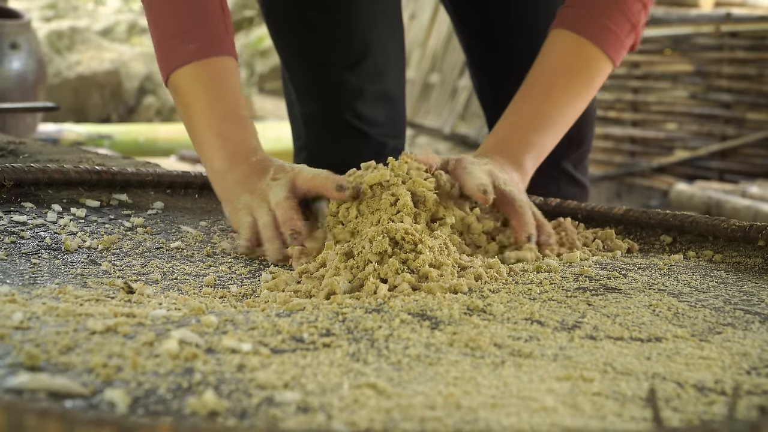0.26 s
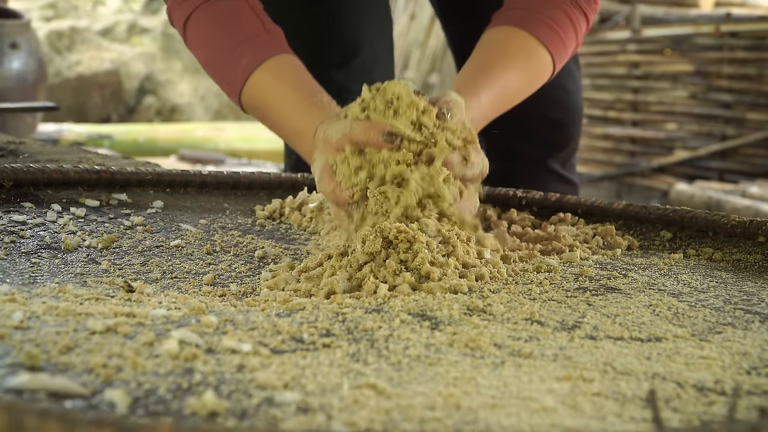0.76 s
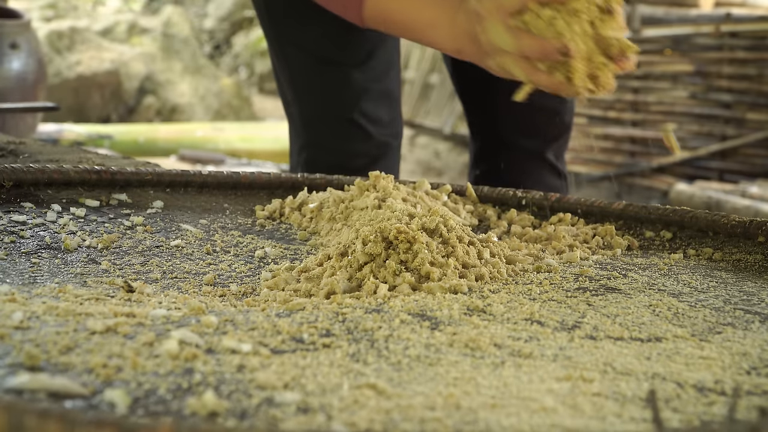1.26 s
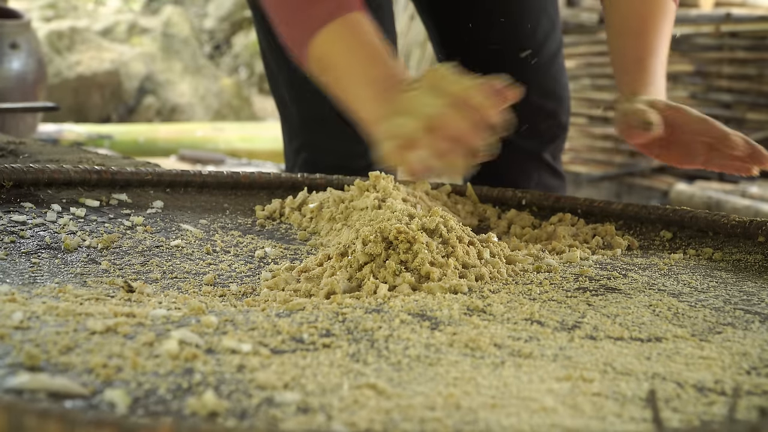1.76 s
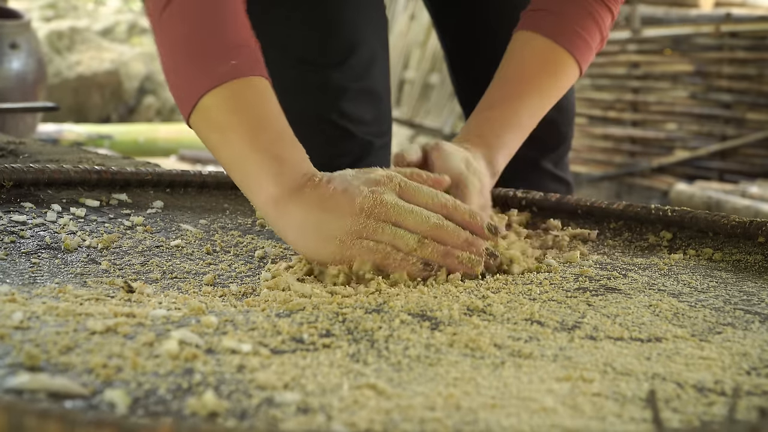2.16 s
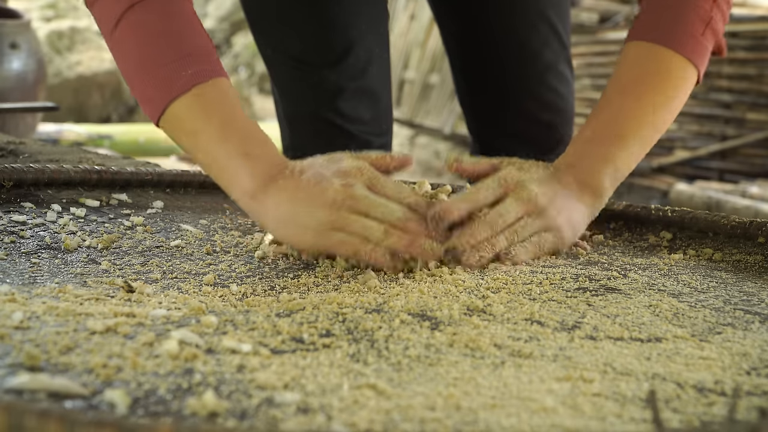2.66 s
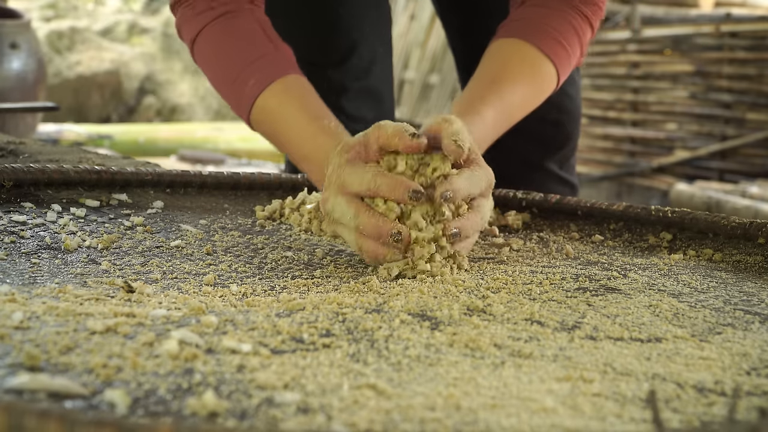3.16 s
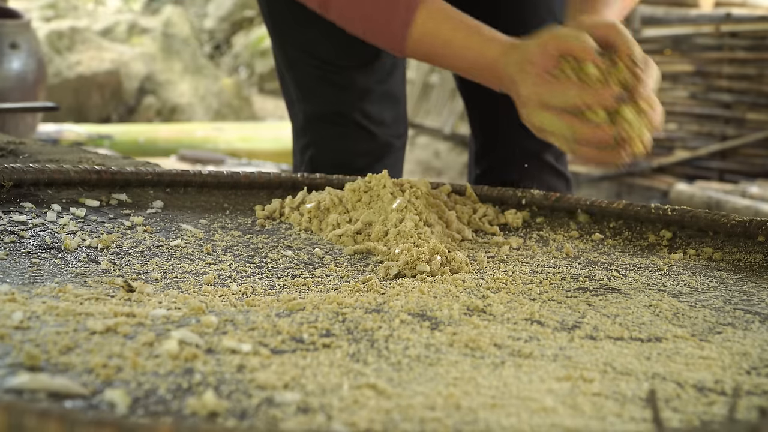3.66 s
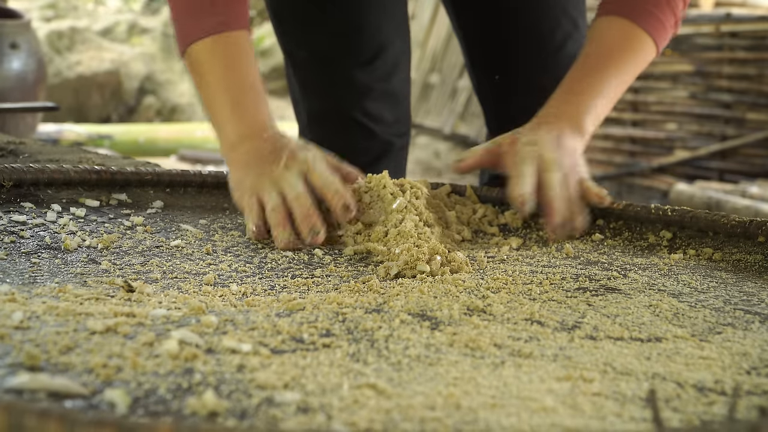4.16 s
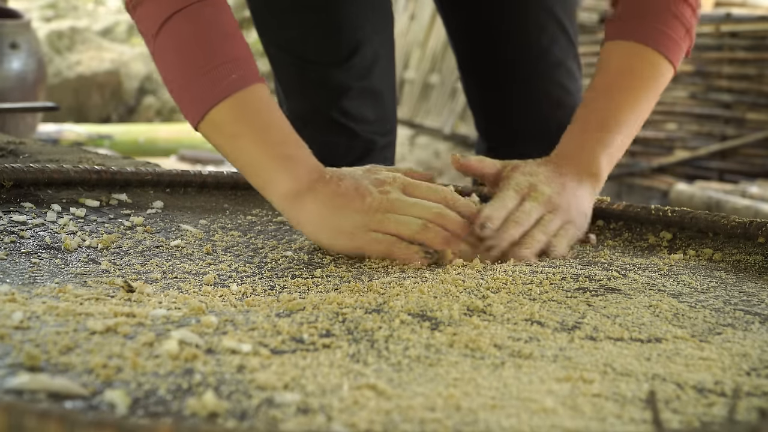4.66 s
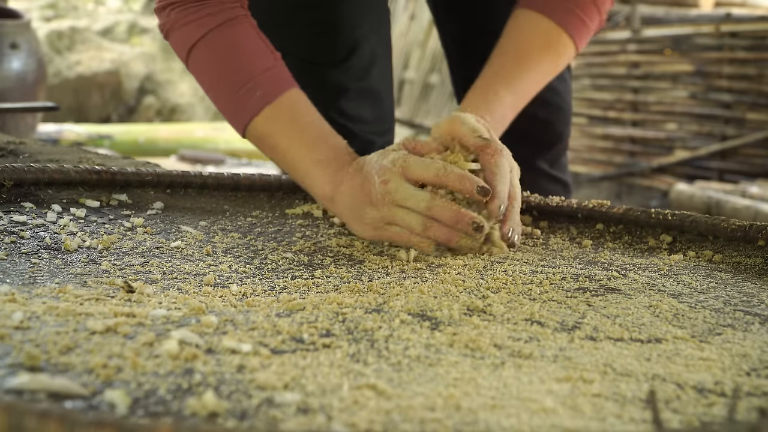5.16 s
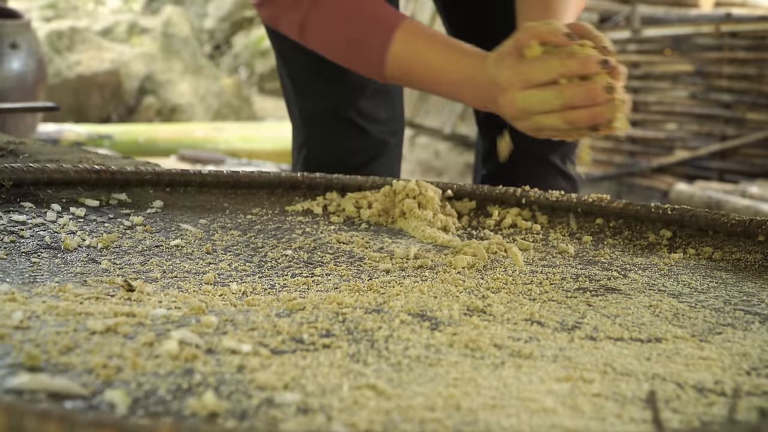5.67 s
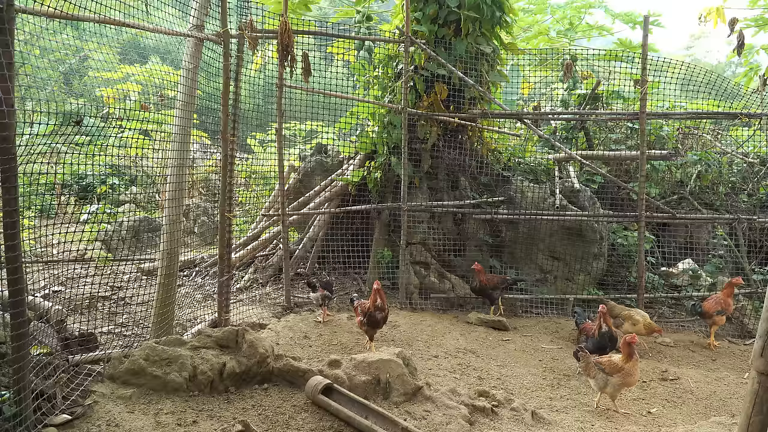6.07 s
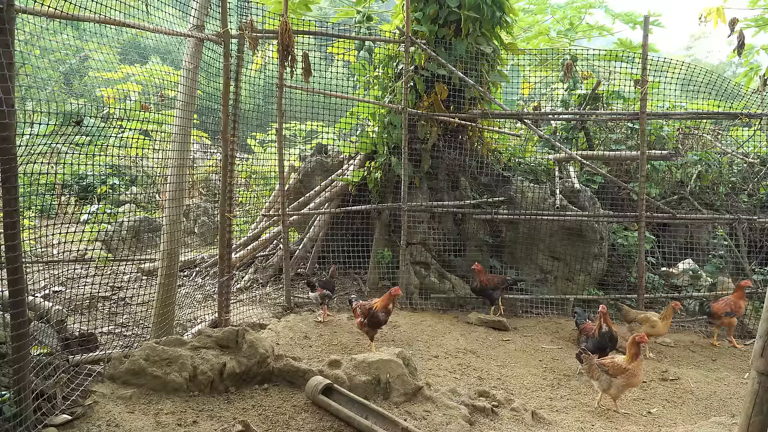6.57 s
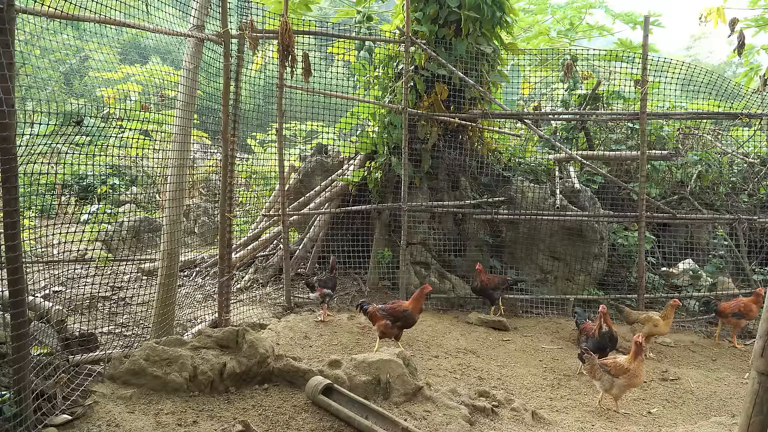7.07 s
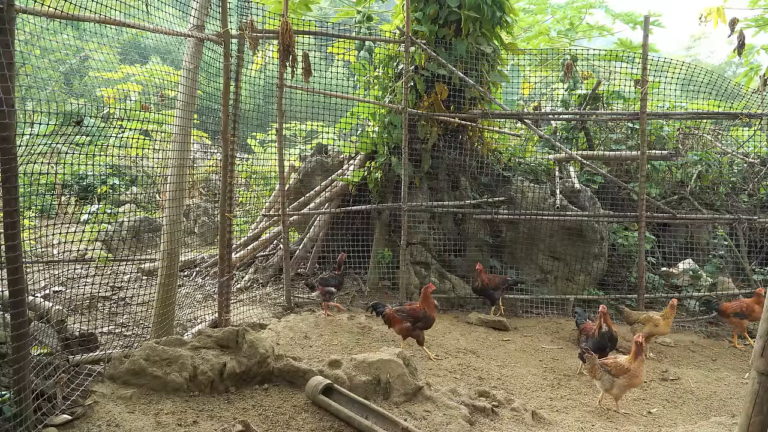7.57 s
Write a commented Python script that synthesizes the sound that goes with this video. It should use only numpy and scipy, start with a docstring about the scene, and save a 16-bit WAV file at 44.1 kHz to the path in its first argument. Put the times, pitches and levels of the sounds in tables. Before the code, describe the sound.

Hands sweep and scoop damp crumbly feed on a woven tray, thudding and pattering into a bucket beside a chirping cricket, then a quiet hen yard.

```python
"""Hands sweep damp feed over a wide woven tray and drop handfuls into a bucket, a cricket chirping near by;
then a cut to a quiet hen yard: insects sing, thin whistles sound far off, a hen pecks and scratches.
Feed is random contacts filtered by tray, heap and grit spectra; blows are decaying tones and grain bursts.
Cricket and insects are resonant noise, whistles wavering sines, the hen scuffing contacts and bursts."""
import sys
import numpy as np
from scipy import signal
from scipy.io import wavfile
from scipy.ndimage import uniform_filter1d

SR = 44100
rng = np.random.default_rng(int(sys.argv[2]) if len(sys.argv) > 2 else 0)


def wav_record(signal):
    """Record a signal, one row per channel, as 16-bit PCM in the file named by sys.argv[1]."""
    frames = np.transpose(np.atleast_2d(signal))
    bounded = np.clip(frames, -1, 1)
    # unit amplitude maps onto the largest positive 16-bit level
    quanta = np.round(bounded * 32767).astype(np.int16)
    wavfile.write(sys.argv[1], SR, quanta)


N = 344862
T = np.arange(N) / SR
BURST_T = T[:4000]
CUT_S = 6.094

# spectrum of grains rubbing in a heap: freq_hz, density_db (relative, per Hz)
HEAP_SPECTRUM = [(250, -16), (450, -3.5), (900, 0), (1300, -3.5), (2500, -11.5), (5000, -32)]
# spectrum of fine dry grit: freq_hz, density_db (relative, per Hz)
GRIT_SPECTRUM = [(1470, -13), (2500, -1), (2640, -1.5), (3980, 3.5), (5150, -1), (6920, -2.5), (8020, -6.5),
                 (14800, -17), (16000, -52)]


def hands():
    """Pellets dragged over the weave drum the tray, rub each other, patter into the bucket and shed grit."""
    # tray drumming: freq_hz, density_db (relative, per Hz)
    tray_spectrum = [(12, -49), (20, -21), (102, -6.5), (151, -4), (202, -2), (232, 0), (265, -2),
                     (348, -8.5), (500, -12), (650, -14.5), (1100, -120)]
    # brightening of hard strokes: freq_hz, density_db (relative, per Hz)
    fizz_spectrum = [(5000, -59), (8000, -6), (12500, 1), (15500, -6), (17000, -50)]
    fizz_db, fizz_power = 24.5, 2.17  # fizz grows as a power of the grit gain
    drum_gain, rub_gain, patter_gain, grit_gain = effort()
    grip = lumpy(0.016, 1.82)  # the heap slips unevenly, in tray and heap alike
    drum = coloured(contacts(1800, 4.4), tray_spectrum)
    rub = patchy(coloured(contacts(1200, 1.6), HEAP_SPECTRUM), 1.85, frames=10, bins=3)
    patter = lumpy(0.0069, 4.1) * evened(bucket(contacts(1200, 1.8)))
    fizz = coloured(contacts(7000, 3.5), fizz_spectrum)
    grit = patchy(coloured(contacts(9000, 2.4), GRIT_SPECTRUM), 2.37, frames=10, bins=14)
    out = grip * (drum_gain * drum + rub_gain * rub)
    out += patter_gain * patter + grit_gain * grit
    return out + gain_of(fizz_db) * grit_gain ** fizz_power * fizz


def effort():
    """Gains of tray, heap, pellets and grit: steady stirring plus strokes, hushed while the fingers rest."""
    # hand strokes: start_s, peak_s, end_s, tray_db, heap_db, pellets_db, grit_db
    strokes = [(0.052, 0.14, 0.18, -63, -62, -39, -60), (0.153, 0.3, 0.72, -27.5, -28.5, -36.5, -39.5),
               (1.203, 1.225, 1.39, -59, -38, -37.5, -56), (1.576, 1.686, 1.71, -48, -27, -31, -54),
               (2, 2.152, 2.216, -21, -24, -32, -31), (2.15, 2.23, 2.37, -21.5, -24.5, -36, -41),
               (2.28, 2.343, 2.9, -38.5, -42, -47, -49), (2.499, 2.661, 2.734, -21, -22, -31.5, -28.5),
               (2.817, 2.947, 3.11, -23, -27, -31.5, -31), (2.958, 3.08, 3.36, -29, -31, -38.5, -33.5),
               (3.532, 3.637, 4, -42, -36.5, -48, -37.5), (3.82, 3.966, 3.96, -46, -29.5, -30.5, -55),
               (4.192, 4.272, 4.436, -24.5, -25, -29.5, -29.5), (4.5, 4.66, 4.95, -21.5, -25.5, -31.5, -32),
               (4.846, 5.03, 5.4, -31, -29, -32.5, -34), (5.082, 5.274, 5.7, -36, -38.5, -43, -40),
               (5.46, 5.564, 5.66, -31, -34, -38.5, -37.5), (5.799, 5.916, 6.1, -48, -60, -39, -61),
               (6.028, 6.047, 5.8, -44, -27.5, -31, -44)]
    # finger rests: start_s, end_s, change_db
    rests = [(1.252, 1.263, -6), (5.452, 5.469, -6), (5.655, 5.677, -2), (5.912, 5.957, -4.5)]
    # stirring between strokes: level_db of tray, heap, pellets, grit
    stir_db = [-43, -43, -43.5, -36.5]
    swell_power = 0.93  # 1 is a straight swell, less is rounder
    power = np.outer(gain_of(stir_db), lumpy(0.022, 2.5)) ** 2
    for start, peak, end, *levels_db in strokes:
        span = slice(int(start * SR), int(max(peak, end) * SR))
        swell = np.interp(T[span], [start, peak, end], [0, 1, 0]) ** swell_power
        power[:, span] += np.outer(gain_of(levels_db), swell) ** 2
    for start, end, db in rests:
        hush_db = np.interp(T, [start - .01, start, end - .001, end], [0, db, db, 0])
        power *= gain_of(hush_db) ** 2
    return np.sqrt(power)


def knocks():
    """Lumps and knuckles hit the tray: a decaying low thud, and a slap mixed with loose grains."""
    # tray knocks: start_s, thud_level_db, thud_hz, slap_peak_db, slap_hz
    knock_table = [(0.279, -33, 180, -21, 890), (0.351, -24, 277, -13, 900), (0.823, -28, 278, -38, 500),
                   (0.846, -31, 247, -10, 787), (0.85, -36, 250, -14, 830), (0.894, -24.5, 332, -15.5, 615),
                   (0.929, -22, 243, -39, 678), (1.125, -23.5, 255, -30, 796),
                   (1.214, -43, 221, -23.5, 1300), (1.265, -11.5, 246, -18, 635),
                   (1.281, -32, 278, -20, 1010), (1.308, -40, 250, -24, 950), (1.29, -21.5, 258, -23, 796),
                   (1.823, -27, 200, -18.5, 1000), (2.141, -9.5, 240, -12, 880),
                   (2.492, -18.5, 135, -19.5, 668), (2.634, -15, 245, -8, 860),
                   (2.767, -34, 281, -19, 1010), (2.852, -15.5, 125, -21, 530),
                   (2.861, -14.5, 111, -34, 533), (2.928, -8.5, 278, -28, 750),
                   (3.2055, -8.5, 181, -36, 500), (3.7, -24, 121, -27, 506), (3.769, -49, 208, -19, 1020),
                   (4.158, -34, 298, -20, 1020), (4.206, -14, 136.2, -39, 587),
                   (4.532, -12.5, 152, -32, 794), (4.611, -16, 161, -13.5, 1060),
                   (4.642, -16, 148, -20, 1010), (5.329, -22.5, 280, -27, 907), (5.495, -35, 150, -22, 800),
                   (5.501, -22, 119.3, -21, 795), (5.529, -11, 186, -14.5, 557),
                   (5.559, -34, 205, -17, 1060), (5.602, -22, 300, -14.5, 780), (5.618, -39, 250, -20, 800),
                   (5.629, -14.5, 210, -9, 960), (5.712, -29, 300, -18, 715), (5.72, -43, 250, -18.5, 665),
                   (5.735, -44, 250, -23, 750), (5.802, -15, 276, -12.5, 937), (5.889, -32, 200, -40, 600),
                   (5.932, -25, 185, -41, 600), (6.033, -40, 300, -14, 770)]
    thud_rise_s, thud_t60_s = 0.0014, 0.031
    slap_rise_s, slap_t60_s, splash_share = 0.00016, 0.019, 0.7
    out, t = np.zeros(N), BURST_T
    thud_shape = peaked(gain_of(-60 * t / thud_t60_s) * (1 - np.exp(-t / thud_rise_s)))
    slap_shape = peaked(gain_of(-60 * t / slap_t60_s) * (1 - np.exp(-t / slap_rise_s)))
    sagging_s = t + 0.085 * 0.0024 * (1 - np.exp(-t / 0.0034))  # pitch starts 6 % sharp and settles
    for s, thud_db, thud_hz, slap_db, slap_hz in knock_table:
        thud = gain_of(thud_db) * thud_shape * np.cos(2 * np.pi * thud_hz * sagging_s)
        slap = slap_shape * np.sin(2 * np.pi * slap_hz * sagging_s)
        slap += splash_share * burst(1.02 * slap_hz, 1600, 0.0058, 0.13, first=1.7)
        add(out, s, -thud - gain_of(slap_db) * peaked(slap))
    return out


def clumps():
    """Clumps break up in the bucket: grain bursts, heard direct and through the ringing wall."""
    # breaking clumps: start_s, level_db (before direct and wall gains), centre_hz, length_s
    clump_table = [(0.72, -22.5, 1770, 0.018), (0.807, -22, 2000, 0.0094), (0.823, -26, 2270, 0.01),
                   (0.845, -20, 1690, 0.003), (1.288, -16, 1930, 0.0036), (1.027, -21.5, 1750, 0.0081),
                   (1.327, -22, 1850, 0.016), (1.41, -23, 1460, 0.016), (1.479, -23, 2640, 0.014),
                   (1.5695, -11.5, 2420, 0.0051), (1.577, -11.5, 1520, 0.013), (1.584, -14, 1900, 0.014),
                   (1.626, -11, 1840, 0.0083), (1.634, -8, 1690, 0.0085), (1.6368, -19, 1900, 0.0045),
                   (1.641, -6, 1470, 0.012), (1.663, -14.5, 806, 0.012), (1.786, -23, 1770, 0.053),
                   (2.009, -20.5, 1690, 0.029), (2.432, -17, 3050, 0.013), (3.175, -20, 1610, 0.0071),
                   (3.42, -17.5, 2950, 0.022), (3.462, -24, 3100, 0.038), (3.624, -19, 1800, 0.023),
                   (3.772, -19.5, 1660, 0.022), (3.803, -14.5, 1960, 0.019), (3.893, -10.5, 1900, 0.0086),
                   (3.942, -11, 1720, 0.0032), (3.947, -16, 1500, 0.045), (3.951, -15, 2150, 0.019),
                   (3.967, -11.5, 1820, 0.019), (3.99, -13.5, 1800, 0.0066), (4.013, -16, 1700, 0.0042),
                   (4.31, -16, 2250, 0.014), (4.398, -21.5, 1750, 0.014), (4.478, -18.5, 2600, 0.015),
                   (4.92, -17, 1640, 0.025), (5.379, -11.5, 1950, 0.02), (5.471, -27, 2110, 0.015),
                   (5.629, -11, 2050, 0.0027), (5.749, -20, 1420, 0.018), (5.846, -18.5, 3400, 0.03),
                   (5.898, -23, 1704, 0.01), (5.961, -17, 2300, 0.0033), (5.964, -14.5, 2700, 0.011),
                   (5.968, -17, 1860, 0.0088), (6.033, -16, 1490, 0.0051), (6.041, -19, 1500, 0.016),
                   (6.061, -16, 1500, 0.006)]
    out = np.zeros(N)
    for s, db, hz, length_s in clump_table:
        add(out, s, gain_of(db) * burst(hz, 1490, length_s, .07, first=1.91))
    return 0.84 * out + gain_of(13.5) * bucket(out)


def bucket(x):
    """The bucket wall rings briefly: narrow modes driven through one broad resonance."""
    # wall modes: freq_hz, width_hz, level_db (before division by root width)
    modes = [(721, 59, 10.5), (1443, 81, 5), (1800, 100, 8.5), (1960, 21, -2.5), (2316, 34, -1),
             (2700, 49, 2.5), (3220, 140, 3)]
    x = resonate(x, 2150, 2500)
    return sum(gain_of(db) * resonate(x, hz, width) / np.sqrt(abs(width)) for hz, width, db in modes)


def smacks():
    """Sticky feed peels off the fingers in bright grain bursts."""
    # smacks: start_s, peak_db, centre_hz, length_s
    smack_table = [(0.506, -23, 3960, 0.03), (0.591, -19, 3570, 0.023), (0.778, -27, 5600, 0.017),
                   (1.023, -25.5, 3220, 0.021), (1.061, -24.5, 2750, 0.03), (1.224, -22, 3880, 0.032),
                   (1.334, -25, 4660, 0.02), (1.571, -20.5, 3670, 0.006), (1.585, -23, 3930, 0.017),
                   (1.666, -15.5, 4870, 0.017), (1.929, -22.5, 5370, 0.032), (2.314, -23.5, 5800, 0.036),
                   (2.823, -25, 6670, 0.013), (3.082, -19, 4570, 0.02), (3.162, -24, 4620, 0.14),
                   (3.338, -19.5, 2980, 0.039), (3.816, -25, 6460, 0.031), (4.246, -21, 3400, 0.065),
                   (4.506, -19.5, 3700, 0.027), (4.502, -17.5, 6170, 0.02), (4.495, -29, 12000, 0.032),
                   (5.24, -15.5, 2900, 0.042), (5.47, -23, 3960, 0.025), (5.528, -18, 3230, 0.018),
                   (5.549, -23, 4470, 0.025), (5.679, -18.5, 3780, 0.02), (5.748, -23, 3600, 0.016)]
    out = np.zeros(N)
    for s, db, hz, length_s in smack_table:
        add(out, s, gain_of(db) * burst(hz, 1670, length_s, 0.22, first=1.2))
    return out


def snaps():
    """Dry pellets snap: very short, wide-band bursts."""
    # snaps: start_s, peak_db
    snap_table = [(0.2608, -18), (0.685, -12), (2.654, -3), (2.892, -9), (2.947, -5), (3.396, -14)]
    out = np.zeros(N)
    for s, db in snap_table:
        add(out, s, gain_of(db) * burst(11800, 10000, 0.0027, 0.075, first=2.9))
    return out


def cricket():
    """Chirps of two wing strokes, each a rough whistle (resonant noise plus a sine) that falls in pitch."""
    # chirps: second_stroke_s, first_peak_db, second_peak_db
    chirps = [(0.175, -25, -22.5), (0.266, -21.5, -42), (0.437, -27, -28), (0.701, -27, -24.5),
              (0.916, -31, -26.5), (1.174, -32, -28.5), (1.384, -28, -26), (1.643, -33, -25),
              (2.162, -27, -30), (2.383, -26, -20.5), (2.687, -23, -23), (2.904, -22.5, -21),
              (3.029, -24, -29), (3.192, -21, -18.5), (3.451, -20.5, -18.5), (3.711, -19, -19.5),
              (3.929, -23.5, -25), (4.192, -27, -23.5), (4.404, -34, -24), (4.659, -32, -29),
              (4.87, -30, -25), (5.128, -30, -26), (5.339, -29, -22.5), (5.593, -27, -18.5),
              (5.85, -27, -21), (6.05, -39, -20)]
    wing_gap_s, stroke_s, lead_in_s = 0.044, 0.033, 0.004
    tone_level = 0.26  # clear tone against noise of peak 1
    out, u = np.zeros(N), np.linspace(0, 1, int(stroke_s * SR))
    hz = 4700 - 750 * u
    tone = tone_level * np.sin(2 * np.pi * np.cumsum(hz) / SR)
    swell = np.sin(np.pi * u ** 0.72)
    for s, first_db, second_db in chirps:
        for lead_s, db in ((wing_gap_s, first_db), (0, second_db)):
            rough = resonate_twice(rng.standard_normal(len(u)), hz, 660)
            stroke = peaked((peaked(rough) + tone) * swell)
            add(out, s - lead_s - lead_in_s, gain_of(db) * stroke)
    return out


def tray_air():
    """Background air by the tray: coloured noise with drifting patches."""
    # air by the tray: freq_hz, density_db (relative, per Hz)
    air_spectrum = [(12, -44), (20, 9), (107, 18.5), (459, -31), (1060, 4.5), (1570, -10), (1810, 6),
                    (2910, -4), (3950, 3.5), (14700, -10.5), (16000, -5.5)]
    noise = coloured(rng.standard_normal(N), air_spectrum)
    return gain_of(-39.5) * patchy(noise, 3.0, frames=20, bins=6)


def hens():
    """Feet scuff soil and leaves as random contacts; beaks knock on wood as grain bursts with a short tail."""
    # scratching, levels interpolated between rows: time_s, scuff_db, rustle_db
    scratch = [(6.14, -56, -71), (7.2, -55.5, -67), (7.29, -43.5, -61), (7.425, -40, -41.5),
               (7.462, -51, -45), (7.53, -50, -53), (7.58, -42, -41), (7.66, -51, -58)]
    # pecks: start_s, level_db, knock_hz
    pecks = [(6.175, -34, 1085), (6.6, -32.5, 890), (6.884, -19.5, 1090), (7.469, -24.5, 745),
             (7.478, -30.5, 2800), (7.565, -30, 2170)]
    s, scuff_db, rustle_db = np.transpose(scratch)
    out = gain_of(np.interp(T, s, scuff_db)) * coloured(contacts(2200, 4.0), HEAP_SPECTRUM)
    out += gain_of(np.interp(T, s, rustle_db)) * coloured(contacts(6000, 2.7), GRIT_SPECTRUM)
    for s, db, hz in pecks:
        peck = burst(hz, 1100, 0.0025, 0.39, first=3.8)
        peck += 0.31 * burst(250, 115, 0.012, 0.045, first=4.6)  # low body
        peck += 0.43 * burst(hz, 1100, 0.033, 0.39)  # tail
        add(out, s, gain_of(db) * peck)
    return out


def insects():
    """Resonant noise: a steady far chorus, and buzzing trills that swell and fade."""
    # chorus bands: freq_hz, width_hz (of each resonance), level_db
    chorus = [(6570, 310, -55), (7050, 220, -61.5), (4980, 780, -54.5)]
    # trills: start_s, end_s, freq_hz, width_hz (of each resonance), level_db
    trills = [(6.097, 6.256, 4740, 450, -47), (6.449, 6.6, 4200, 250, -52),
              (6.785, 6.965, 4700, 400, -47.5), (7.061, 7.21, 4200, 400, -48.5),
              (7.417, 7.66, 4750, 400, -48)]
    out = np.zeros(N)
    for hz, width, db in chorus:
        song = resonate_twice(rng.standard_normal(N), hz, width)
        out += gain_of(db) * evened(song) * lumpy(0.011, 2.3)
    for start, end, hz, width, db in trills:
        noise = rng.standard_normal(int((end - start) * SR))
        song = evened(resonate_twice(noise, hz, width))
        add(out, start, gain_of(db) * song * signal.windows.tukey(len(song), .6))
    return out


def whistles():
    """Thin far notes: sines that waver a little in pitch and level."""
    # whistles: start_s, end_s, mean_hz, level_db (sine peak, before waver)
    whistle_table = [(6.36, 6.6, 2450, -54), (6.63, 6.82, 2470, -57), (6.68, 6.79, 3570, -55),
                     (6.8, 7.0, 3560, -62), (7.01, 7.26, 3580, -55), (7.35, 7.52, 3400, -58),
                     (7.63, 7.76, 3350, -59)]
    out = np.zeros(N)
    for start, end, hz, db in whistle_table:
        t = T[:int((end - start) * SR)]
        waver = evened(uniform_filter1d(rng.standard_normal(SR // 2), 1500))[:len(t)]
        note = np.sin(2 * np.pi * np.cumsum(hz + 9 * waver) / SR)
        note *= gain_of(db + 1.5 * waver[::-1])
        add(out, start, note * signal.windows.tukey(len(t), .4))
    return out


def yard_air():
    """Background air of the yard: coloured noise with drifting patches."""
    # air of the yard: freq_hz, density_db (relative, per Hz)
    yard_spectrum = [(12, -31), (20, 4), (68, 1), (248, -6), (718, -18), (949, -14), (3740, -17.5),
                     (4810, -16), (5850, -24.5), (6540, -20), (8650, -26.5), (14700, -29), (16000, -28)]
    noise = coloured(rng.standard_normal(N), yard_spectrum)
    return gain_of(-42) * patchy(noise, 1.9, frames=20, bins=4)


def gain_of(db):
    """Decibels to gain."""
    return 10 ** (np.asarray(db) / 20)


def evened(x):
    """Scales to rms 1."""
    return x / np.sqrt(np.mean(x ** 2) + 1e-20)


def peaked(x):
    """Scales to peak 1."""
    return x / np.max(np.abs(x))


def add(mix, s, sound):
    """Mixes a sound in at a time in seconds."""
    part = mix[round(s * SR):][:len(sound)]
    part += sound[:len(part)]


def coloured(x, points):
    """Minimum-phase filter by a spectrum, ringing only after each contact; scales to rms 1."""
    f, db = np.transpose(points)
    hz = np.fft.rfftfreq(8192, 1 / SR)
    curve_db = np.interp(np.log(hz + 1), np.log(f + 1), db)
    log_gain = np.log(gain_of(np.maximum(curve_db, -70)))
    mirrored = np.r_[log_gain, log_gain[-2:0:-1]]
    ring = np.fft.ifft(np.exp(np.conj(signal.hilbert(mirrored)))).real
    return evened(signal.oaconvolve(x, ring[:4096])[:len(x)])


def resonate(x, hz, width_hz):
    """A one-pole resonance of gain about 1, at a set pitch or following the curve hz."""
    r = np.exp(-np.pi * abs(width_hz) / SR)
    if np.ndim(hz) == 0:
        return 2 * signal.lfilter([1 - r], [1, -r * np.exp(2j * np.pi * hz / SR)], x).real
    turn = np.exp(2j * np.pi * np.cumsum(hz) / SR)
    return 2 * (turn * signal.lfilter([1 - r], [1, -r], x / turn)).real


def resonate_twice(x, hz, width_hz):
    """Two equal resonances in series, for steeper skirts."""
    return resonate(resonate(x, hz, width_hz), hz, width_hz)


def contacts(per_s, spread_db):
    """Random tiny collisions, mostly small, a few large; rms 1."""
    hit, sign, size = rng.random((3, N))
    strength = gain_of(-spread_db * np.log(size + 0.037))
    return evened((hit < per_s / SR) * np.sign(sign - .5) * strength)


def lumpy(span_s, depth_db):
    """Uneven gain of rms 1 that drifts over about span_s."""
    width = max(int(span_s * SR), 2)
    drift = uniform_filter1d(uniform_filter1d(rng.standard_normal(N), width), width)
    return evened(gain_of(depth_db * evened(drift)))


def patchy(x, depth_db, frames, bins):
    """Shifts the colour in random patches of time and pitch; scales to rms 1."""
    z = signal.stft(x, nperseg=256, noverlap=192)[2]
    field = rng.standard_normal(z.shape)
    for _ in range(2):
        field = uniform_filter1d(uniform_filter1d(field, bins, 0), frames, 1)
    bass_guard = np.minimum(np.arange(len(z)) / 4, 1)[:, None]  # the lowest bass stays even
    field = evened(field) * bass_guard
    return evened(signal.istft(z * gain_of(depth_db * field), nperseg=256, noverlap=192)[1][:N])


def burst(hz, width_hz, length_s, density, first=1.8):
    """A sudden shower of grains around one pitch that holds, then dies; peak 1."""
    grains = rng.standard_normal(len(BURST_T)) * (rng.random(len(BURST_T)) < density)
    grains[0] = first  # a set strength for the first contact
    shower = resonate_twice(grains, hz, width_hz)
    return peaked(shower * np.exp(-(BURST_T / max(length_s, .003)) ** 1.37))


def scene():
    """The tray up to the cut, the yard after it; the same sound in both channels."""
    tray = hands() + knocks() + clumps() + smacks() + snaps() + cricket() + tray_air()
    yard = hens() + insects() + whistles() + yard_air()
    before = np.clip((CUT_S - T) / .003, 0, 1)
    after = np.clip((T - CUT_S) / .012, 0, 1)
    return np.tile(tray * before + yard * after, (2, 1))


def record(dry):
    """Limits the band with a linear-phase low-pass."""
    edge_hz = 15850
    low_pass = signal.firwin(511, edge_hz, window=("kaiser", 9), fs=SR)
    return signal.oaconvolve(dry, low_pass[None], "same")


dry = scene()
out = record(dry)
wav_record(out)
```